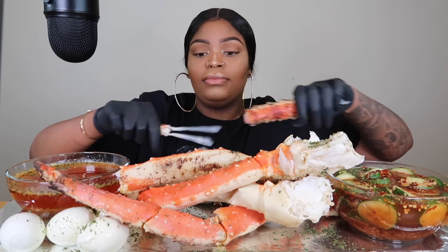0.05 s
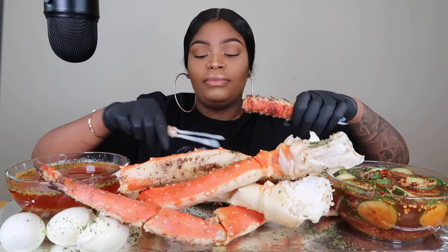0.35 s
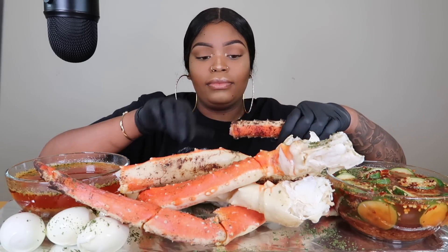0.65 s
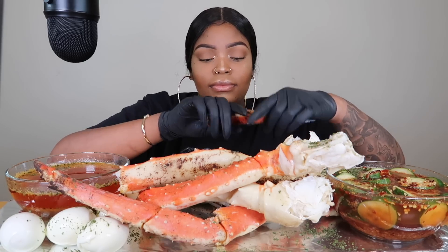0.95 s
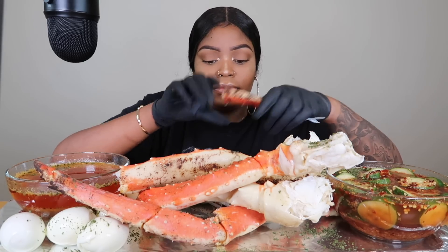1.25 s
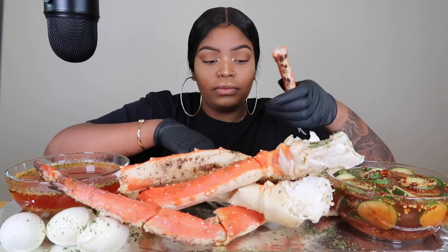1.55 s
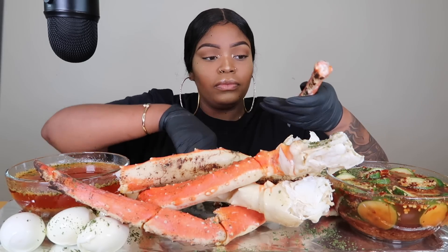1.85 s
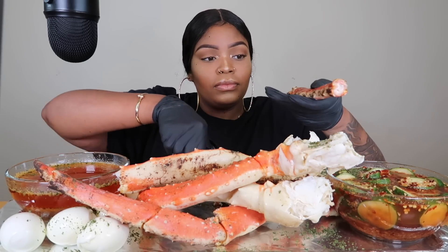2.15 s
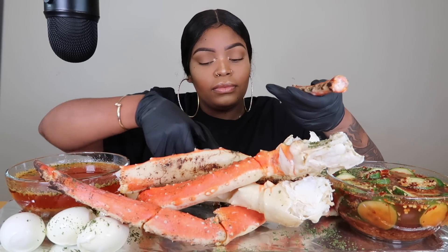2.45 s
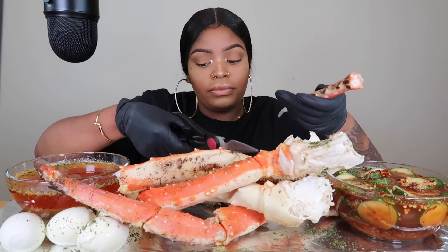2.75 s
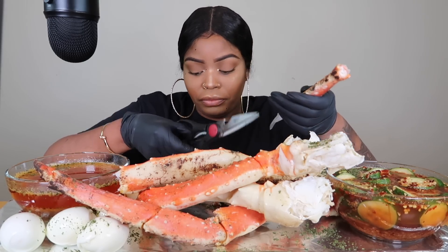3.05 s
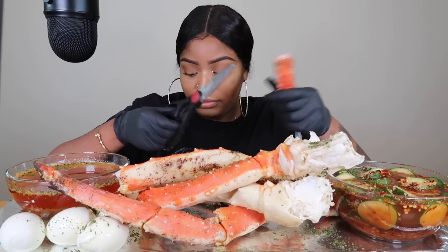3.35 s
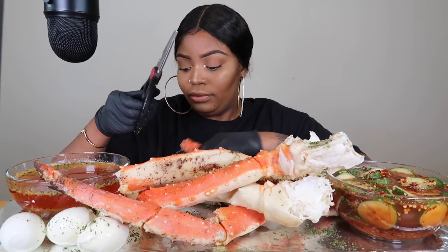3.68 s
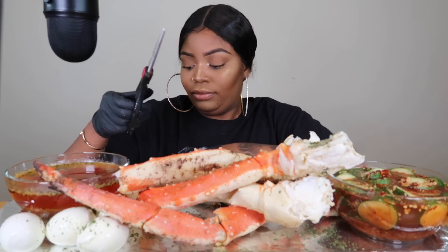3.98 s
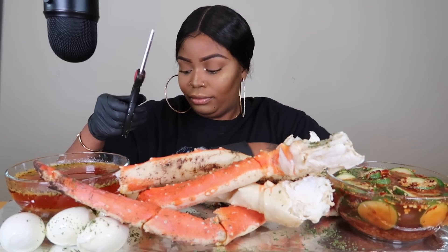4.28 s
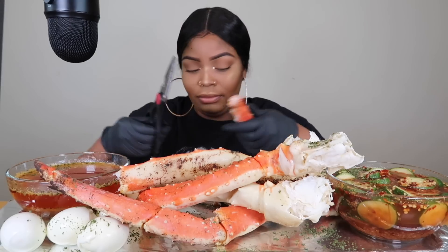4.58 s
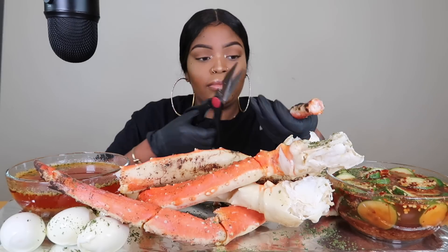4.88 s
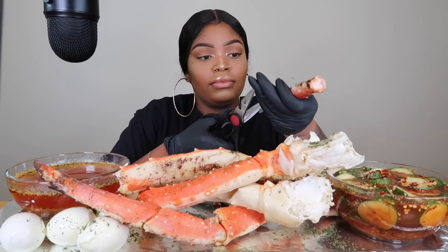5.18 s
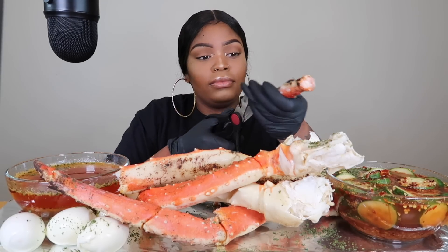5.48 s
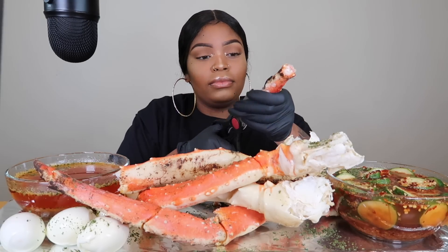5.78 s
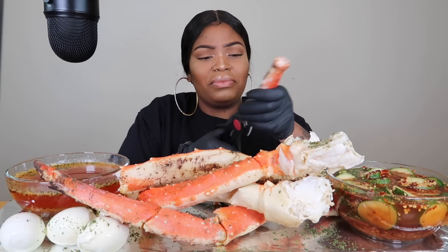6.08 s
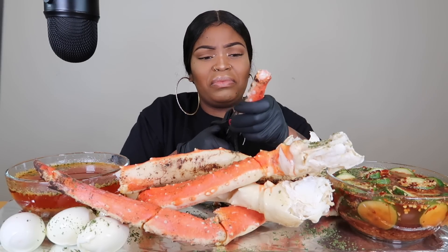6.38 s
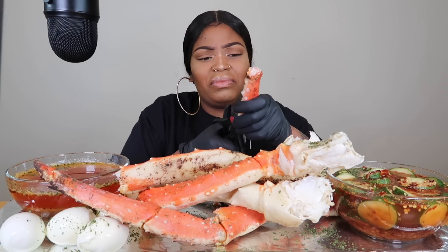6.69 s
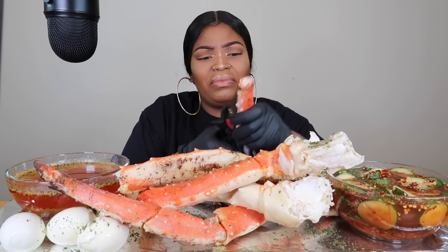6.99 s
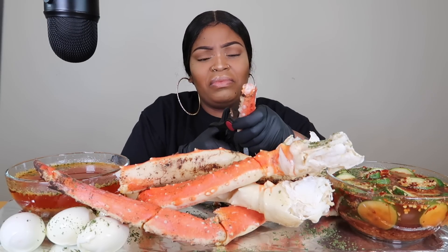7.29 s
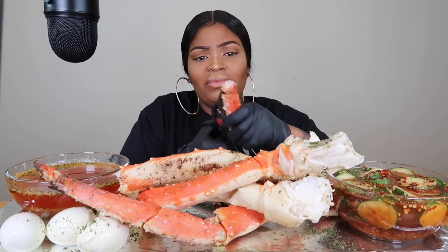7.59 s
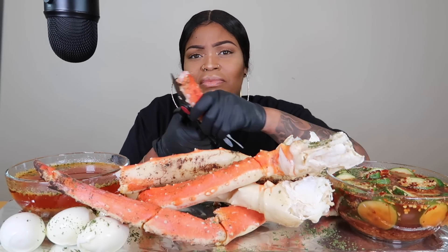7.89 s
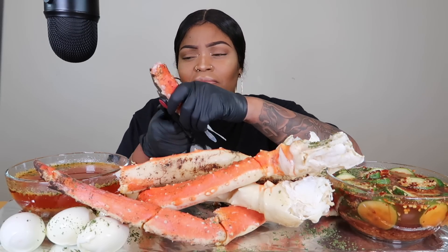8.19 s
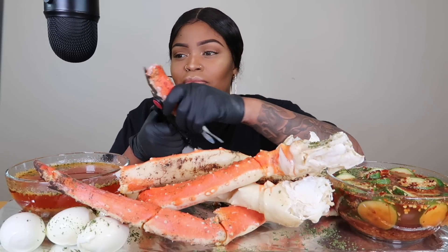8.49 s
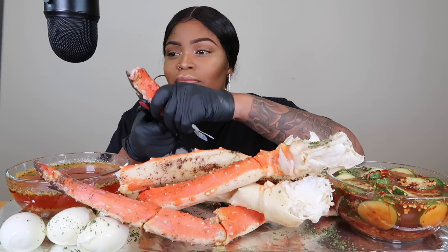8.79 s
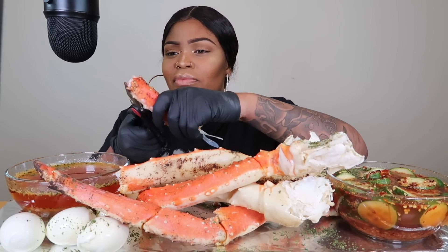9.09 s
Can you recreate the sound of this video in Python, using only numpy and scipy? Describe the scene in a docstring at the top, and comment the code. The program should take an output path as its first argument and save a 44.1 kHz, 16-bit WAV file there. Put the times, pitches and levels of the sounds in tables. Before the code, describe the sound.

In a quiet, slightly echoing room, a close microphone catches sticky rubber gloves working on a crab leg. A utensil drops on the table with a quick clatter, followed by a short scrape and more knocks as shears are lifted. Two hollow taps sound on a bin. Through the second half, the shears cut the shell with faint rasps, padded handle thumps and loud, irregular clusters of brittle cracks.

```python
"""Shears through a crab leg

Gloved hands work on a cooked crab leg, close up in a bare room; the wet rubber fizzes and ticks.
A pick clatters onto the table, shears skid off it, and the leg is knocked against a hollow bin.
Then the shears bite along the leg: the blades rasp and creak, the shell snaps in lurching bursts,
and the room rings after each one over a soft bed of air."""
import sys
import numpy as np
from scipy import signal
from scipy.fft import rfft, irfft
from scipy.io import wavfile
from scipy.ndimage import uniform_filter1d, minimum_filter1d

SR = 44100
rng = np.random.default_rng(int(sys.argv[2]) if len(sys.argv) > 2 else 0)


def master(y):
    """Save y as 16-bit WAV."""
    cut = np.clip(np.atleast_2d(y).T, -1, 1)
    pcm = np.round(cut * 32767)  # scale
    wavfile.write(sys.argv[1], SR, pcm.astype(np.int16))


N = 403074

# The big snaps. Each row: start in seconds, energy in dB, running time in seconds, brightness in dB.
FRACTURES = [(5.6865, -22, 0.0023, -27), (5.827, -30, 0.0045, 4), (5.9564, -14.5, 0, 17),
             (5.9662, -7, 0.000082, 9), (5.9682, 4, .0055, 10.5), (5.9992, -7.5, 0.0041, 3.5),
             (6.1905, -14, 0.00057, -36), (6.198, -19.5, 0, -39), (6.3366, -17, 0.0031, -1),
             (6.44, -6.5, 0.0073, 7.5), (6.47, -12.5, .003, 8), (6.784, -18, 0.0018, -14),
             (6.8068, -22, 0, 10), (6.8388, -2.5, 0.00033, 6.5), (6.8712, -9.5, .002, 4),
             (6.8915, 0, 0.0022, 10.5), (6.8995, -2.5, 0.00045, 7.5), (7.0215, -12, 0.0022, -10),
             (7.0633, -15, 0, -4), (7.2176, -12.5, 0.00059, -8), (7.2443, -10.5, 0.0043, 18),
             (7.2518, -10, 0.0016, 10), (7.2572, -12, 0, 16), (7.286, -9, 0.0089, 10),
             (7.2935, -6.5, 0.0066, 7), (7.6638, -20.5, 0, 9), (7.6729, -15.5, 0, 14),
             (7.6806, -10, 0.00057, 14), (7.703, -15, 0.004, 18), (7.713, -5, 0.0034, 9),
             (7.7225, -12, 0, -13), (7.7315, -6, 0, 4), (7.7388, -12, 0.00095, -5), (7.763, -10, 0.0078, 8),
             (8.0902, -26, 0, -10), (8.1235, -14.5, 0.0066, 12), (8.138, -14.5, 0.006, 12),
             (8.1755, -9.5, 0.00023, 7), (8.2032, -13, .001, 7), (8.329, -14, 0.0043, 7),
             (8.342, -13.5, 0.004, 2.5), (8.812, -24, 0.0024, -3.5), (8.8947, -15, 0.00076, 17),
             (8.9073, -15.5, .002, 6), (8.9859, -8, 0.0065, 7), (8.9975, -8, 0, 5), (9.0362, -6.5, 0, 10),
             (9.063, -7.5, 0.0018, 10)]
# Shell crumbling between the blades. Each row: start and length in seconds, typical energy in dB,
# brightness in dB.
CRUMBLING_BITES = [(6.383, .043, -23.5, -2), (6.817, .018, -24, 13), (7.743, .045, -15, -5),
                   (8.912, .06, -37, 23), (9.007, .022, -13.5, 6)]
# Blades sliding on shell. Each row: start and length in seconds, level in dB.
BLADE_SLIDES = [(5.497, .14, -45.5), (5.617, 0.065, -30.5), (6.165, 0.051, -29.5), (6.202, 0.047, -27),
                (6.318, 0.038, -32.5), (6.593, 0.083, -32.5), (7.038, 0.058, -29), (7.445, 0.047, -34.5),
                (7.705, 0.047, -25), (7.898, 0.041, -33.5), (8.07, 0.033, -39.5), (8.545, 0.061, -34)]
# The shell's creak under pressure. Each row: pitch in Hz, width in Hz, gain in dB.
CREAK_MODES = [(1780, 200, 2), (2460, 330, 4), (3040, 340, -18)]
# Handles meeting inside the glove. Each row: start in seconds, relative level in dB.
HANDLE_THUMPS = [(5.97, -27), (6.443, -31), (7.739, -35.5), (8.091, -27), (8.812, -27.5)]
# Hits on the table and on the bin. Each row: start in seconds, relative level in dB, rattle t60 in
# seconds, then bass, hollowness, treble and room send in dB, and main pitch in Hz.
TABLE_HITS = [(.6618, 1, 0.084, -14, 2, -8.5, 4.5, 611), (.7115, -3, 0.068, -17, 10, -29, 1.5, 528),
              (.7755, -9, 0.083, 0.5, 3, -9, 4.5, 685), (1.472, -20.5, .037, -1, 2, -19, -8, 538),
              (1.498, -14.5, .091, 2, 6, -24, -5, 510), (1.568, -14, 0.016, 9.5, 13, -22, 6.5, 580),
              (1.7885, -2.5, 0.035, 2, 2, 5, 2, 698), (2.209, -17, .047, -28, 0, -23, 0, 632),
              (2.6338, 0.5, 0.024, -3, -2.5, -8, 7.5, 601), (2.75, -11.5, 0.071, -4, 2.5, -8, 8.5, 538),
              (2.894, -4, 0.14, -6, -18, -17.5, 6.5, 462), (2.946, -8, 0.26, 5.5, -3, -13, 7, 256),
              (3.994, -19.5, .042, 10.5, 7, -9, 6.5, 1093), (4.034, -23, 0.017, 6, -2, -5.5, 7.5, 1166)]
BIN_HITS = [(4.557, -2, 0.07, -4.5, 2, 13.4, 13.6, 1110), (4.7035, -5, 0.051, -6, -6.5, 8, 14.1, 1187)]
# How the table top and the bin ring. Each row: pitch in Hz, relative level in dB, t60 in seconds.
TABLE_RING = [(99.1, -14, 1), (144.9, -6.5, 0.78), (256, -16.5, 0.44), (451.6, -7.5, .45), (536, -6, 0.17),
              (724, 2, 0.24), (914, -8, .2), (1147, -3, 0.63)]
BIN_RING = [(99.4, 3.5, 1), (1410, -3, 0.37), (1700, -8, 0.19)]
# Pushes on the shears, then glove strokes. Each row: start and length in seconds, relative level in dB.
SHEAR_PUSHES = [(1.466, 0.44, -40.5), (1.828, 0.098, -32), (2, .02, -29.5), (2.036, 0.043, -24),
                (2.142, 0.015, -31)]
GLOVE_STROKES = [(0, 0.076, -49.5), (0.423, 0.21, -52.5), (.629, 0.03, -34), (0.799, 0.69, -52),
                 (1.157, 0.12, -48), (1.473, 0.92, -43.5), (2.155, 0.083, -37.5), (2.3, 0.15, -39.5),
                 (2.44, 0.1, -36.5), (2.53, 0.38, -46), (3.287, 0.17, -50), (4.333, 0.097, -53.5),
                 (4.914, 0.081, -48)]
# Wet rubber letting go of shell. Each row: start in seconds, relative level in dB, film pitch in Hz.
PEEL_TICKS = [(.734, -5.5, 8000), (1.494, -7.5, 6550), (1.9578, -7.5, 6500), (2.357, -8, 6830),
              (2.473, 0, 6650), (2.593, -5.5, 3320)]
# The tone of each source and of the reverb. Each row: frequency in Hz, gain in dB.
SHELL_EQ = [(40, -51), (200, -22), (700, -5.5), (1100, -6.5), (1500, 2.5), (2000, 3), (3500, 0.5),
            (5000, -5.5), (7500, -8), (10000, -11), (15000, -17.5)]
BLADE_EQ = [(100, -61), (700, -3), (1400, -12), (1900, 0), (2700, -4.5), (3800, -6), (6000, -12),
            (15000, -17.5)]
HANDLE_EQ = [(50, -38), (150, 6.5), (450, -7), (1000, -5.5), (4000, -30)]
TABLE_EQ = [(40, -53), (130, -21.5), (330, -12.5), (480, -9.5), (620, -5.5), (850, -6), (1300, -6.5),
            (2200, -10.5), (3500, -13.5), (8000, -24), (15000, -40.5)]
BIN_EQ = [(40, -47), (95, 8), (200, 0), (450, 0), (680, 8.5), (900, -7.5), (1150, 0.5), (1650, 7.5),
          (2200, -5.5), (3100, -13.5), (4000, -27.5), (7000, -34.5), (15000, -42.5)]
SKID_EQ = [(100, -2.5), (330, -10), (700, 10.5), (1000, -11), (1400, 8.5), (1900, -7), (2500, 4.5),
           (3050, -18), (3450, 1.5), (3800, -9.5), (8000, -13.5), (15000, -26)]
RUBBER_EQ = [(200, -12), (1200, -9.5), (3000, -3.5), (5200, -6.5), (7000, -1), (8200, -4), (10000, -9),
             (15000, -13)]
AIR_EQ = [(35, -16), (60, -17), (102, -10.5), (162, -4), (251, -1.5), (332, -9), (399, -4.5), (762, -14.5),
          (816, -9), (960, -15), (2530, -24.5), (4510, -36), (15000, -49)]
ROOM_EQ = [(100, -10.5), (500, -7), (2000, -7.5), (8000, -9), (11000, -12.5), (15000, -14.5)]
# The room's decay. Each row: frequency in Hz, t60 in seconds.
ROOM_DECAY = [(100, .5), (260, .7), (700, .5), (1800, .62), (4000, .5), (14000, .47)]


def shell_cracks(snap_t60=0.002, flutter_t60=0.014, splinter_t60=0.27, plate_t60=0.011):
    """Each fracture runs in lurches, sheds splinters and rings the shell. Returns direct and send."""
    direct, send, t = np.zeros(N), np.zeros(N), np.arange(2048) / SR
    bands_hz = np.geomspace(500, 15000, 9)
    release = dying(t, snap_t60) + amp(-8) * dying(t, flutter_t60)
    for s, db, run_s, bright_db in list(FRACTURES) + crumbling():
        lurches = (t == 0) + amp(-6.5) * abs(slips(len(t), per_s=900, spread_db=1.5)) * (t < run_s)
        strain = signal.fftconvolve(lurches, release)[:len(t)]
        tearing = strain * slips(len(t), per_s=24000, spread_db=2.5)
        splinters = slips(len(t), per_s=600, spread_db=5) * dying(t, splinter_t60)
        crunch = packed(tearing) + amp(-18) * packed(splinters)
        snap = colour(crunch, SHELL_EQ, shine(bright_db), hollowness(s))
        plate_hz = 1700 * rng.uniform(1, 1.56)
        plate = signal.fftconvolve(lurches, ping(t, plate_hz, plate_t60))[:len(t)]
        plate_db = -6 - 0.68 * bright_db  # duller snaps ring more
        snap = packed(packed(snap) + amp(plate_db) * packed(plate))
        # every shard beams its own colour at the microphone
        shard_eq = np.transpose([bands_hz, 2.2 * rng.standard_normal(len(bands_hz))])
        add(direct, s, amp(db) * packed(colour(snap, shard_eq)))
        add(send, s, amp(db) * snap)
    return direct, send


def crumbling(per_s=110, spread_db=3, longest_run_s=0.0013, bright_spread_db=12):
    """Small fractures tumble unevenly through a bite. Returns rows like those of FRACTURES."""
    rows = []
    for s, length, db, bright_db in CRUMBLING_BITES:
        jitter, run = rng.random((2, 16))
        size, bright = rng.standard_normal((2, 16))
        at = (np.arange(16) + jitter) / per_s
        small = np.transpose([s + at, db + spread_db * size, longest_run_s * run,
                              bright_db + bright_spread_db * bright])
        rows += list(small[at < length])
    return rows


def hollowness(s, body_db=4, loss_db_per_s=7, first_bite_s=6.0):
    """A low shelf for time s: the tube of shell loses its hollow body as the cut runs along it."""
    return [(900, body_db - loss_db_per_s * max(s - first_bite_s, 0)), (1500, 0)]


def blade_rasps(firm_db=-36, creak_rise=0.096):
    """Blades chatter over the shell; more pressure dulls them and brings out a climbing creak."""
    out = np.zeros(N)
    for s, length, db in BLADE_SLIDES:
        pressure_db = db - firm_db
        friction = slips(SR // 4, per_s=4700, spread_db=4)
        chatter = colour(friction, BLADE_EQ, shine(-0.17 * pressure_db))[:int(length * SR)]
        climb = 1 + creak_rise * np.linspace(-.5, .5, len(chatter))
        creak = sum(amp(gain) * resonate(chatter, hz * climb, width) for hz, width, gain in CREAK_MODES)
        rasp = evened(chatter) + amp(-10 + 1.5 * pressure_db) * evened(creak)
        add(out, s, amp(db) * evened(rasp) * signal.windows.tukey(len(rasp), .5))
    return out


def handle_thumps(t60=0.021):
    """The handles meet with a padded thud as the shears close."""
    out, t = np.zeros(N), np.arange(SR // 8) / SR
    for s, db in HANDLE_THUMPS:
        add(out, s, amp(db) * packed(colour(burst(t, t60), HANDLE_EQ)))
    return out


def knocks(hits, body_eq, modes, modes_db, main_t60, attack_s, gain_db):
    """A rattling contact shakes a body, which rings most at one pitch. Returns direct and send."""
    direct, send, t = np.zeros(N), np.zeros(N), np.arange(SR // 2) / SR
    attack = np.minimum(t / attack_s, 1) ** 2
    for s, db, rattle_t60, bass_db, hollow_db, treble_db, room_db, main_hz in hits:
        body = packed(colour(burst(t, rattle_t60), body_eq))
        for hz, mode_db, mode_t60 in modes:
            body += amp(modes_db + mode_db) * packed(ping(t, hz, mode_t60))
        # the place and hardness of the contact decide which resonances wake
        mid_db = -2.5 + 0.21 * treble_db
        contact_eq = [(220, bass_db), (400, hollow_db), (600, hollow_db), (850, 0),
                      (1300, mid_db), (1900, mid_db), (3000, treble_db)]
        main_note = amp(-4.5) * packed(ping(t, main_hz, main_t60))
        blow = packed(attack * (packed(colour(body, contact_eq)) + main_note))
        add(direct, s, amp(db + gain_db) * blow)
        add(send, s, amp(db + gain_db + room_db) * blow)
    return direct, send


def shear_skid(gain_db=-3, attack_s=0.0038, release_t60=0.24, hz_per_db=13):
    """Shears skid over the table in short pushes; it sings higher under a harder push."""
    out, t = np.zeros(N), np.arange(SR // 2) / SR
    for s, length, db in SHEAR_PUSHES:
        chatter = slips(len(t), per_s=1700, spread_db=0.5)
        scrape = evened(colour(chatter, SKID_EQ))
        sing_hz = 636 + hz_per_db * (db + 33)
        sing = evened(resonate(chatter, sing_hz, width_hz=45))
        push = np.minimum(t / attack_s, 1) * dying(t - length, release_t60)
        add(out, s, amp(db + gain_db) * push * (scrape + sing))
    return out


def gloves(crinkle_db=-73, rub_db=-1, clump_db=3, tick_db=-11):
    """Wet rubber crinkles faintly throughout, fizzes in clumps on a stroke and ticks as it lets go."""
    crinkle = slips(N, per_s=700, spread_db=4)
    out = amp(crinkle_db) * evened(colour(crinkle, RUBBER_EQ))
    for s, length, db in GLOVE_STROKES:
        clumps = amp(clump_db * evened(uniform_filter1d(rng.standard_normal(SR // 2), size=500)))
        fizz = colour(slips(SR // 2, per_s=4500, spread_db=2) * clumps, RUBBER_EQ)[:int(length * SR)]
        sheen = resonate(fizz, hz=7100, width_hz=1500)
        sheen_db = 15 + .5 * db  # a firmer stroke pulls the film taut, and it rings high
        stroke = evened(fizz) + amp(sheen_db) * evened(sheen)
        add(out, s, amp(db + rub_db) * stroke * signal.windows.tukey(len(stroke), .3))
    t = np.arange(SR // 10) / SR
    for s, db, hz in PEEL_TICKS:
        tick = colour(burst(t, t60=0.11), RUBBER_EQ, shine(7))
        film = resonate(tick, hz, width_hz=900)
        add(out, s, amp(db + tick_db) * packed(packed(tick) + amp(-2) * packed(film)))
    return out


def sticky_ticks(idle_per_s=9, idle_db=-48, stroke_per_s=25, stroke_lift_db=6.5, spread_db=3.5):
    """Tiny tacky ticks, each its own colour: sparse throughout, thicker and louder during a stroke."""
    out, t, bands_hz = np.zeros(N), np.arange(1024) / SR, np.geomspace(1000, 15000, 7)
    spans = [(0.0037, N / SR, idle_per_s, idle_db)]
    spans += [(s, length, stroke_per_s, db + stroke_lift_db) for s, length, db in GLOVE_STROKES]
    for start, length, per_s, db in spans:
        for s in start + length * rng.random(round(length * per_s)):
            patch_eq = np.transpose([bands_hz, spread_db * rng.standard_normal(len(bands_hz))])
            tick = colour(burst(t, t60=0.0088), RUBBER_EQ, patch_eq, size=512)
            add(out, s, amp(db + spread_db * min(rng.exponential(), 2)) * packed(tick))
    return out


def room(x, gap_s=0.0063, build_s=0.0057):
    """After a short gap, reflections build into a tail in which each band dies at its own speed."""
    t = np.arange(SR) / SR
    taps = slips(SR, per_s=9100, spread_db=3) * (1 - 0.11 * np.exp(-t / build_s))
    hz, at, bands = signal.stft(taps, SR, nperseg=256)
    bands = bands * amp(read(ROOM_EQ, hz))[:, None] * dying(at, read(ROOM_DECAY, hz)[:, None])
    tail = signal.istft(bands, SR, nperseg=256)[1][:SR] * (t > gap_s)
    mean_t60 = np.mean(ROOM_DECAY, axis=0)[1]
    tail /= np.linalg.norm(taps * dying(t, mean_t60))
    return signal.oaconvolve(x, tail)[:N]


def moving_room(x, turn_s=0.9):
    """The send circles through three reverbs, so reflections shift as they do round a turning source."""
    turn = 2 * np.pi * np.arange(N) / SR / turn_s
    return sum(room(x * np.sqrt(2 / 3) * np.cos(turn + 2 * np.pi * k / 3)) for k in range(3))


def air(level_db=-45.5):
    """Room tone: a soft, low, steady rush."""
    return amp(level_db) * evened(colour(rng.standard_normal(N), AIR_EQ, size=8192))


def slips(length, per_s, spread_db):
    """Stick and slip: random clicks, a few much larger than the rest."""
    size = amp(spread_db * np.minimum(rng.exponential(1, length), 4))
    return size * rng.choice([-1, 1], length) * (rng.random(length) < per_s / SR)


def dying(t, t60):
    """Falls by 60 dB in t60 seconds."""
    return np.exp(-np.log(1000) * np.maximum(t, 0) / t60)


def burst(t, t60):
    """A dying puff of noise."""
    return rng.standard_normal(len(t)) * dying(t, t60)


def ping(t, hz, t60):
    """A dying sine."""
    return np.sin(2 * np.pi * hz * t) * dying(t, t60)


def resonate(x, hz, width_hz):
    """A resonance of gain 1 at a steady or gliding pitch."""
    turn = np.exp(2j * np.pi * np.cumsum(np.broadcast_to(hz, len(x))) / SR)
    pole = np.exp(-np.pi * width_hz / SR)
    return 2 * (turn * signal.lfilter([1 - pole], [1, -pole], x / turn)).real


def colour(x, *curves, size=2048):
    """Minimum-phase EQ whose gain is the sum of the given dB curves."""
    hz = np.fft.rfftfreq(size, 1 / SR)
    cepstrum = irfft(np.log(amp(sum(read(curve, hz) for curve in curves))))
    cepstrum[1:size // 2] *= 2
    cepstrum[size // 2 + 1:] = 0
    return signal.oaconvolve(x, irfft(np.exp(rfft(cepstrum))))[:len(x)]


def shine(db):
    """A treble shelf."""
    return [(2500, 0), (10000, db)]


def read(points, hz):
    """Joins points by straight lines on a log-frequency axis."""
    f, value = np.transpose(points)
    return np.interp(np.log(hz + 1), np.log(f + 1), value)


def amp(db):
    """Decibels to gain."""
    return 10 ** (np.asarray(db) / 20)


def evened(x):
    """Scales to rms 1."""
    return x / np.sqrt(np.mean(x ** 2) + 1e-20)


def packed(x):
    """Scales to the energy of one millisecond at rms 1."""
    return x * np.sqrt(SR / 1000 / (np.sum(x ** 2) + 1e-20))


def add(mix, s, sound):
    """Mixes a sound in at s seconds."""
    part = mix[max(round(s * SR), 0):][:len(sound)]
    part += sound[:len(part)]


def scene(width_db=-31):
    """Close sounds and their reverb sit in the centre, with a very faint stereo spread."""
    rush, blades, skid = air(), blade_rasps(), shear_skid()
    table, table_send = knocks(TABLE_HITS, TABLE_EQ, TABLE_RING, modes_db=-13.5,
                               main_t60=0.12, attack_s=0.00038, gain_db=0.5)
    bin_hits, bin_send = knocks(BIN_HITS, BIN_EQ, BIN_RING, modes_db=-19,
                                main_t60=0.022, attack_s=0.0033, gain_db=-4.5)
    hands, handles = gloves() + sticky_ticks(), handle_thumps()
    shell, shell_send = shell_cracks()
    shell_send *= amp(-3)
    send = table_send + bin_send + amp(-3) * handles
    send += amp(-6) * blades + amp(-4) * skid + amp(-5) * hands
    shell_tail = moving_room(shell_send, turn_s=0.006)  # a fast turn gives each snap its own tail
    close = shell + blades + 2 * handles + table + bin_hits + skid + hands
    mid = close + 2 * shell_tail + moving_room(send) + rush
    side = amp(width_db) * room(send + rush + .5 * shell_send)
    return np.array([mid + side, mid - side])


def record(dry, ceiling=1.0, low_cut_hz=65, high_cut_hz=15900):
    """A low cut clears the rumble, a fast limiter holds the peaks, and a high cut trims the top."""
    lean = signal.sosfilt(signal.butter(2, low_cut_hz, "highpass", fs=SR, output="sos"), dry)
    allowed_gain = ceiling / np.maximum(abs(lean).max(0), ceiling)
    limited = lean * uniform_filter1d(minimum_filter1d(allowed_gain, size=31), size=31)
    high_cut = signal.firwin(301, high_cut_hz, window=("kaiser", 8), fs=SR)
    return signal.oaconvolve(limited, high_cut[None], "same", axes=1)


dry = scene()
out = record(dry)
master(out)
```